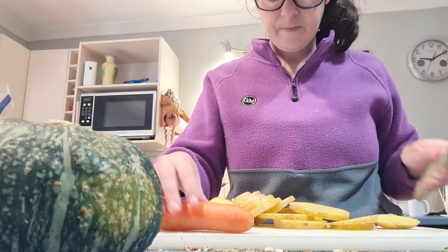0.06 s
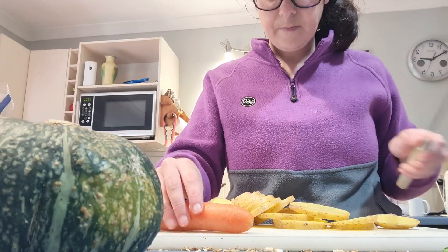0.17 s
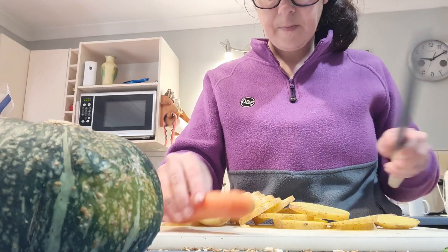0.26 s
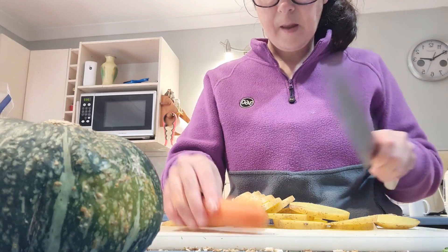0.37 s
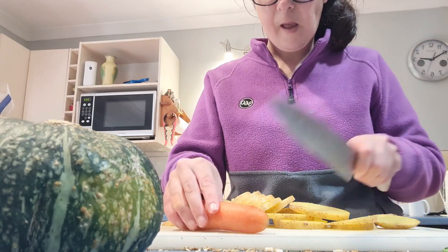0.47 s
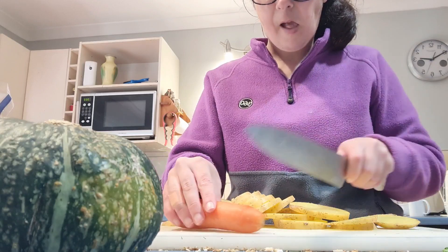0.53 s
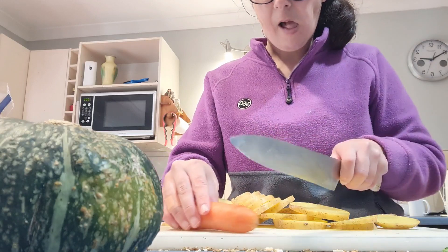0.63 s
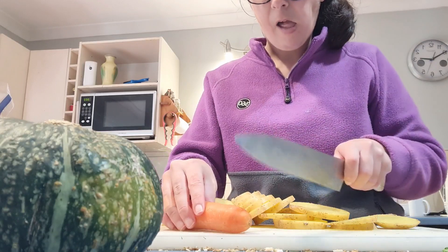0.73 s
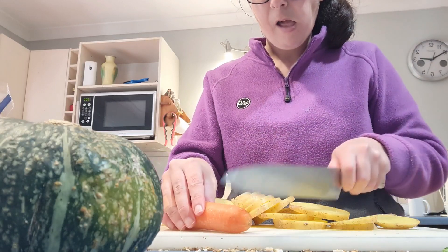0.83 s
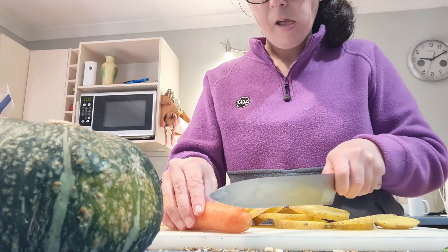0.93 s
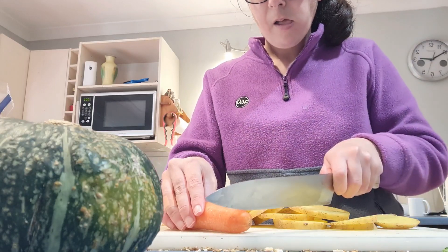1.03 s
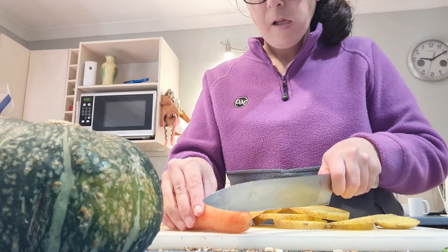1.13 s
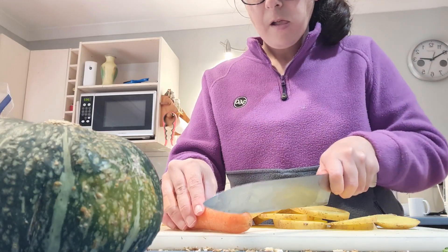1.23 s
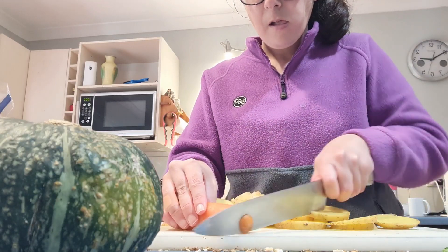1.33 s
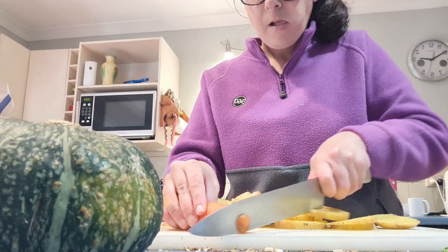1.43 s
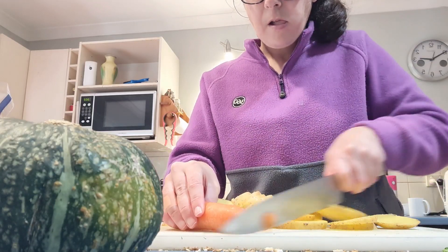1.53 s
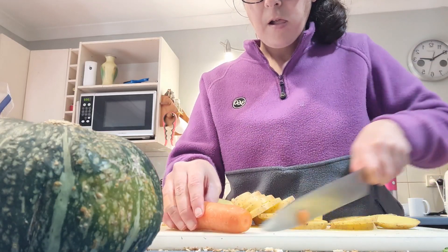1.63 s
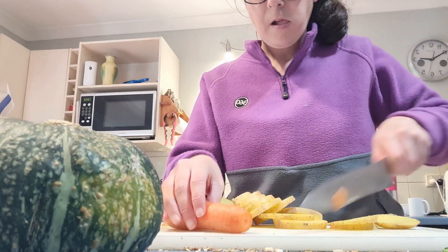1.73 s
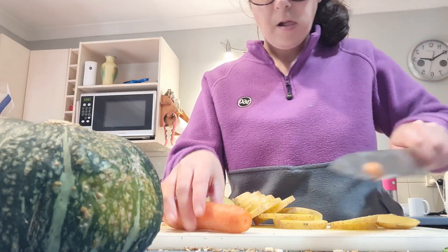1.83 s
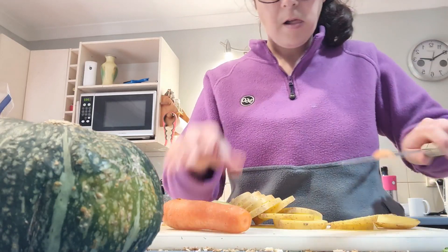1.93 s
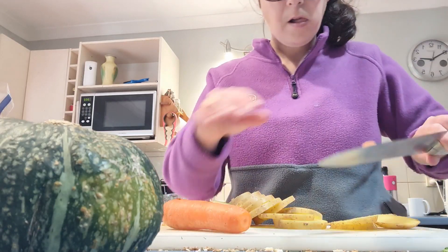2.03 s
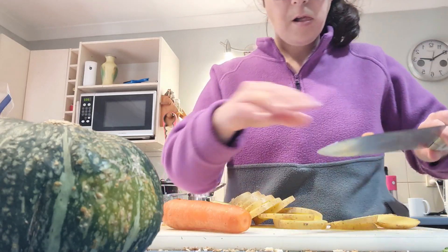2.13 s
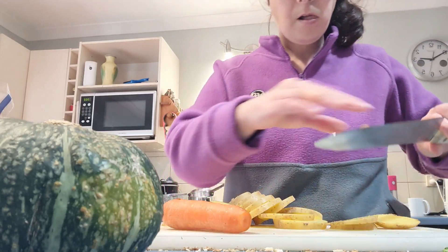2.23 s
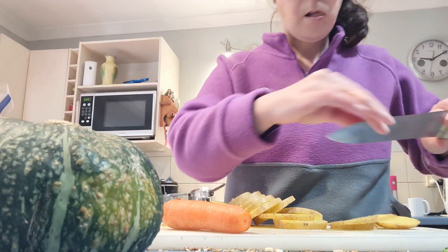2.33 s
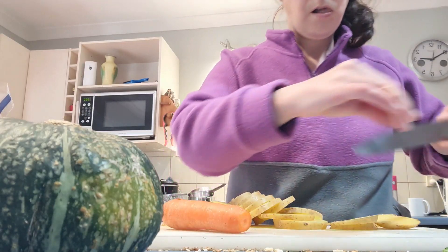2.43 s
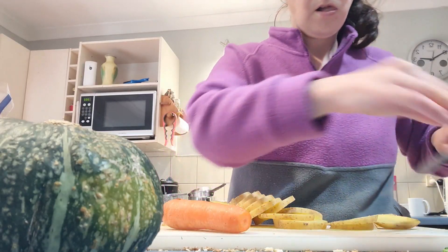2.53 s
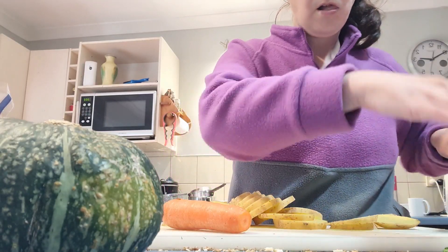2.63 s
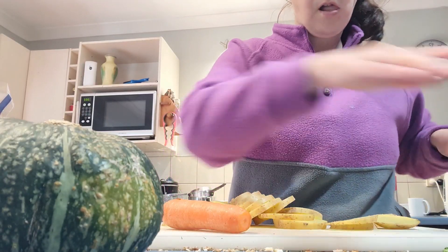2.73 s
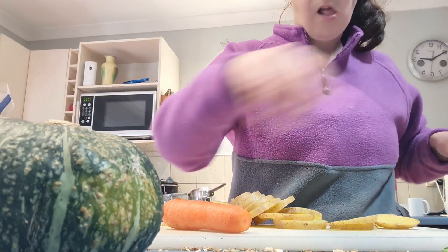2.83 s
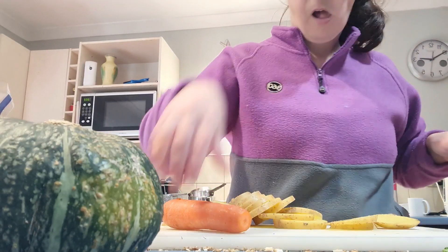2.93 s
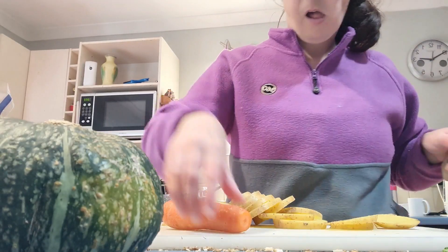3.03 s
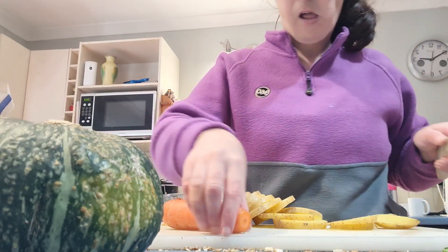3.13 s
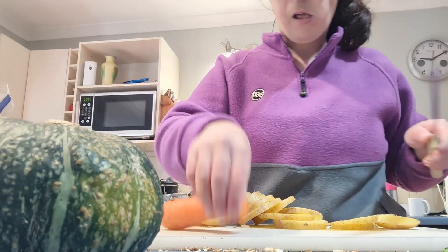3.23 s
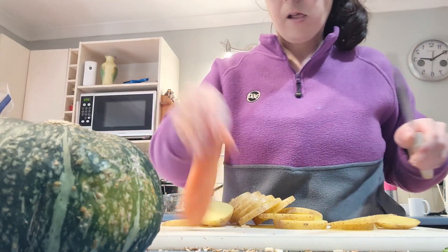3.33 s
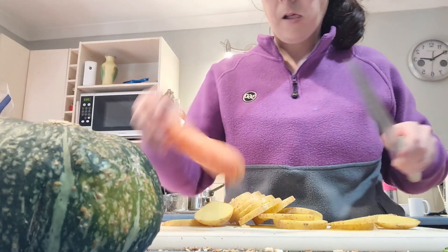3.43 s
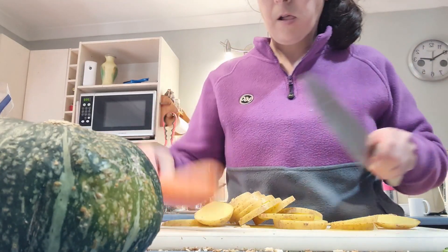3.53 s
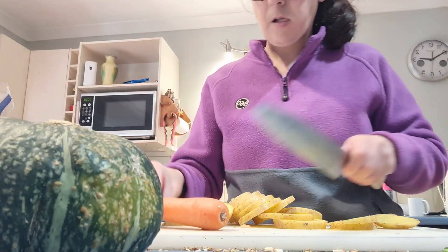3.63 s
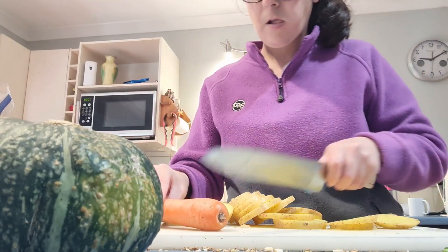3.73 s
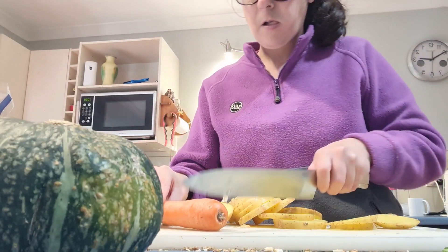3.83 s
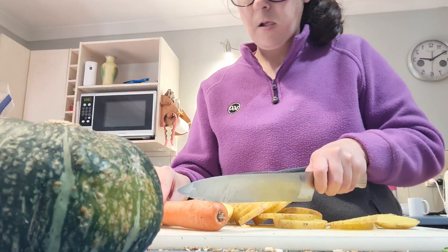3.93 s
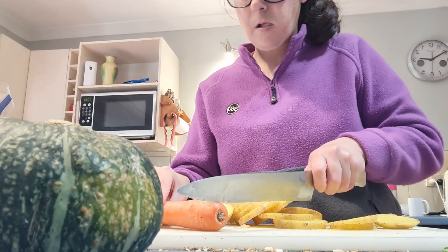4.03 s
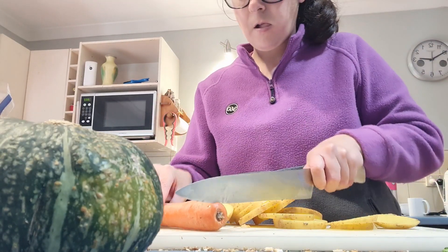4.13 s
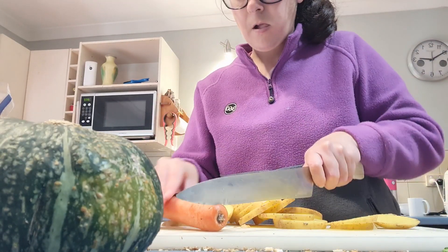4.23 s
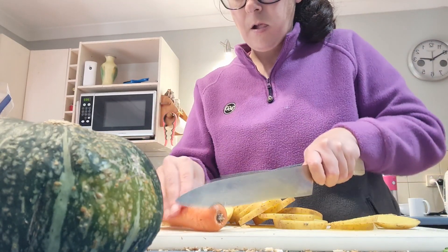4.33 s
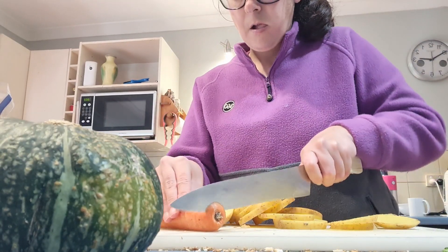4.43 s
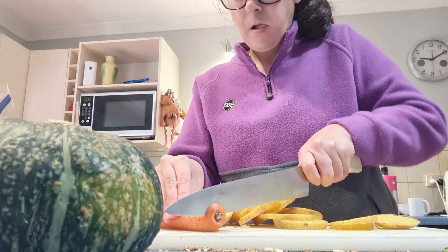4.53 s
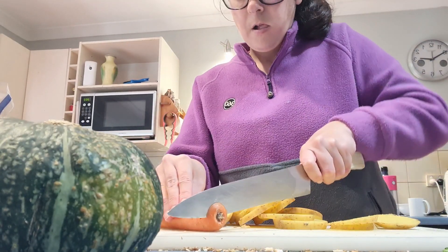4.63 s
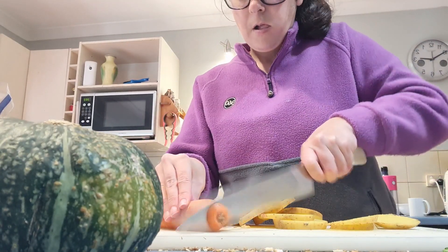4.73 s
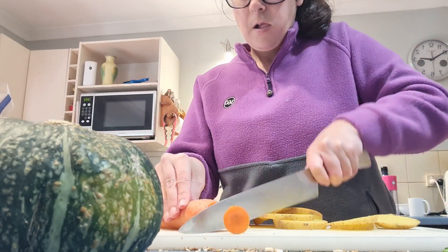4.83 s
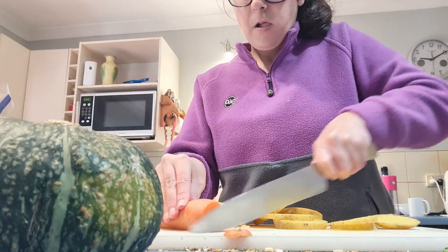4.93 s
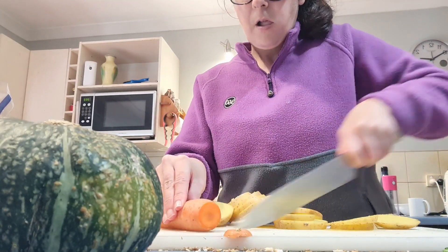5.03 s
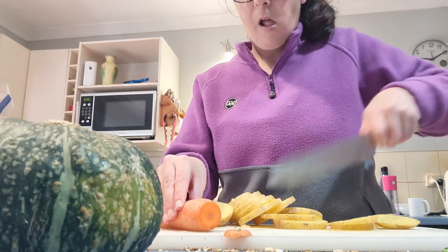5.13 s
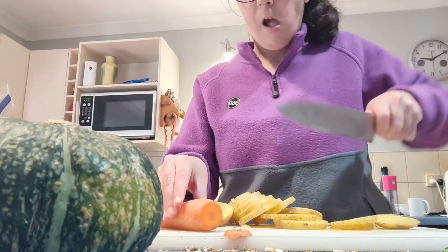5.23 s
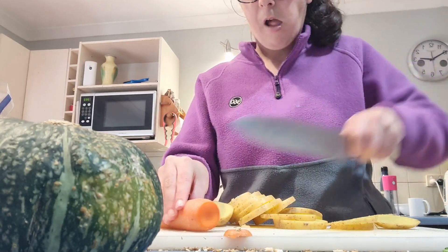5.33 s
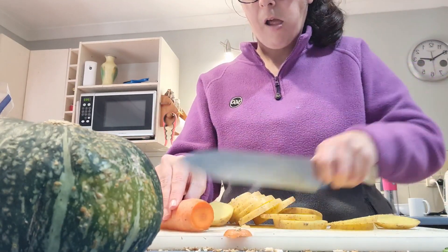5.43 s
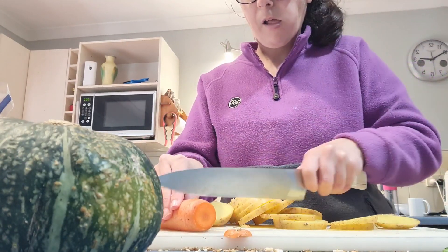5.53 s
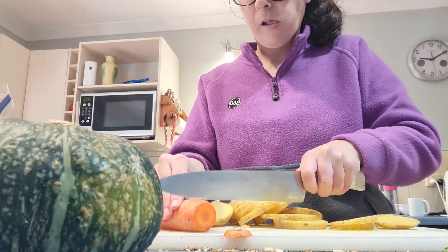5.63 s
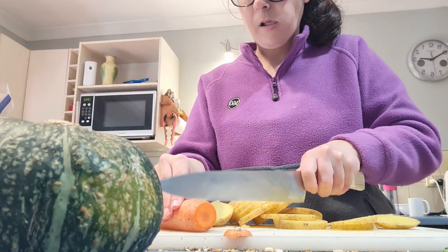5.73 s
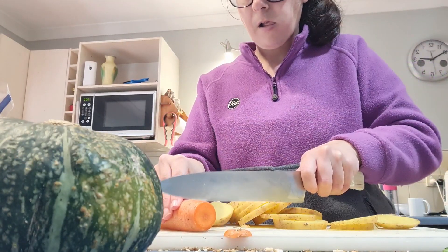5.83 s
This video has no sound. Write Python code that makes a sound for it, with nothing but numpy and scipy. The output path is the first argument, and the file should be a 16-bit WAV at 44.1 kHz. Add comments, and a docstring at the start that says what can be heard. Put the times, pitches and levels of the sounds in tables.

```python
"""A small kitchen: a carrot is laid on a wooden cutting board, trimmed, turned round and trimmed again.
Twice the knife crunches and knocks: decaying board modes under a short noise crack, plus steel rings.
Hand and carrot thud and shuffle, made of softer board blows, short notes and swells of noise.
Sleeves swish over a soft, swaying hiss of noise bands; echoes are decaying noise convolved with the
contacts, and a gain control holds down peaks above its threshold."""
import sys
import numpy as np
from scipy import signal
from scipy.io import wavfile

SR = 44100
rng = np.random.default_rng(int(sys.argv[2]) if len(sys.argv) > 2 else 0)


def generate_wav(signal):
    """Clip the signal to [-1, 1] and save it as 16-bit WAV at the path in sys.argv[1]."""
    frames = np.transpose(np.atleast_2d(signal))
    scaled = np.clip(frames, -1, 1) * 32767
    pcm = np.round(scaled).astype(np.int16)
    wavfile.write(sys.argv[1], SR, pcm)


N = 259308


def from_db(db):
    """Decibels to gain."""
    return 10 ** (np.asarray(db) / 20)


def rms_one(x):
    """Scale to rms 1."""
    return x / np.sqrt(np.mean(x ** 2) + 1e-20)


def blow_one(x):
    """Scale a blow to rms 1 over its first 30 ms."""
    return x / np.sqrt(np.mean(x[..., :int(0.03 * SR)] ** 2) + 1e-20)


def at_hz(points, hz, axis=1):
    """Read one column of a table on a log-frequency axis."""
    points = np.array(points)
    return np.interp(np.log(hz), np.log(points[:, 0]), points[:, axis])


def band(x, low, high, order=2):
    """Butterworth band-pass."""
    sos = signal.butter(order, [low, min(high, 0.45 * SR)], "band", fs=SR, output="sos")
    return signal.sosfilt(sos, x)


def add(out, s, sound):
    """Mix a sound in at time s."""
    i = int(round(s * SR))
    out[..., i:i + sound.shape[-1]] += sound[..., :N - i]


def dying(t, t60):
    """Exponential decay, 60 dB down after t60."""
    return np.exp(-np.log(1000) * t / t60)


SECOND_NOTE_T60_S = 0.079   # shared by the knife's and the carrot's second notes

# the knife comes down on the board: t/s, level/dB, pitch f/Hz, treble loss/dB per octave,
# second contact level/dB against the first, note level/dB against the blow, note t60/s,
# second note f/Hz, second note level/dB against the blow, factor on the board's ring times,
# steel level/dB against the blow
CUTS = [(1.3418, -21, 571.6, 4.5, -13.5, 9, 0.075, 205, -5.5, 0.66, -14.5),
        (4.7522, -16.5, 690.5, 5, -2, -6.5, .17, 368, -5, 0.65, -12)]
# ring of the steel: f/Hz, relative level/dB (before chance scatter), t60/s
MODES_OF_BLADE = [(2400, -1, 0.015), (2464, -1.5, 0.031), (3056, -0.5, 0.061), (3400, -5.5, 0.1),
                  (3920, -8, 0.08), (5900, -7, 0.012), (6850, 2, .045)]


def cuts():
    """The knife knocks on the board and its steel rings; returns that blow and the contact's notes."""
    board, near = np.zeros((2, 2, N))
    for (s, level_db, hz, treble_loss_db, second_db, note_db, note_t60,
         other_hz, other_db, ring, steel_db) in CUTS:
        levels_db = level_db + contact_levels(hz, 7.5, treble_loss_db)
        knock = blow(levels_db, ring, second_db, scatter_db=1)
        steel = blow_one(modes(MODES_OF_BLADE, ring=1, scatter_db=1).sum(axis=1))
        add(board, s, knock + from_db(level_db + steel_db) * steel)
        add(near, s, note(hz, level_db + note_db, note_t60))
        add(near, s, note(other_hz, level_db + other_db, SECOND_NOTE_T60_S))
    return board, near


# crunch close to a blow, as the carrot splits ahead of the edge or scuffs the board:
# end t/s, length/s, level at the end/dB, brightness f/Hz
SPLITS = [(1.3388, 0.0097, -20, 1196), (3.571, 0.011, -26.5, 700), (4.755, 0.022, -14.5, 5000)]


def splits(growth_db):
    """Bursting cells crackle as grainy noise that swells by growth_db up to the end of the crunch."""
    out = np.zeros((2, N))
    for end, length, level_db, bright_hz in SPLITS:
        grains = port_noise(bright_hz, SR // 4) * rng.exponential(1, SR // 4)
        coloured = band(band(grains, 300, CUTOFF_HZ), 250, bright_hz, order=1)
        crunch = rms_one(coloured)[:, :int(length * SR)]
        swell_db = growth_db * np.linspace(-1, 0, crunch.shape[1])
        add(out, end - length, crunch * from_db(level_db + swell_db))
    return out


# the steel edge pings as it meets the wood:
# t/s, f/Hz, level/dB, t60/s, overtone f/Hz, overtone level/dB against the ping
EDGE_PINGS = [(1.3419, 1320, -16, 0.019, 3670, -12), (4.7505, 1333, -16, 0.062, 2380, -9),
              (4.926, 1326, -45, 0.028, 2240, -14)]


def edge_pings():
    """The thin edge gives a very short note with one overtone, heard directly, without echo."""
    out = np.zeros((2, N))
    for s, hz, level_db, t60, overtone_hz, overtone_db in EDGE_PINGS:
        add(out, s, note(hz, level_db, t60))
        add(out, s, note(overtone_hz, level_db + overtone_db, 0.021))
    return out


# the carrot is set down: t/s, level/dB, pitch f/Hz, treble loss/dB per octave,
# second contact level/dB against the first, note level/dB against the blow, note t60/s,
# upper note f/Hz and level/dB, lower note f/Hz and level/dB, both against the blow
SET_DOWNS = [(0.3986, -26, 259, 8, -9, -2.5, 0.16, 650, -7.5, 220, -13),
             (3.5714, -22.5, 548, 4.5, 3.5, 3.5, 0.068, 809.5, 1.5, 404.4, -2.5)]


def set_downs(ring):
    """The carrot thuds on the board; returns the board's answer and the carrot's own three notes."""
    board, near = np.zeros((2, 2, N))
    for (s, level_db, hz, treble_loss_db, second_db, note_db, note_t60,
         upper_hz, upper_db, lower_hz, lower_db) in SET_DOWNS:
        # less bass loss than the knife: the carrot lands heavier
        levels_db = level_db + contact_levels(hz, 2, treble_loss_db)
        add(board, s, blow(levels_db, ring, second_db, scatter_db=1))
        notes = note(hz, note_db, note_t60)
        notes = notes + note(upper_hz, upper_db, SECOND_NOTE_T60_S)
        notes = notes + note(lower_hz, lower_db, 0.035)
        add(near, s, from_db(level_db) * notes)
    return board, near


# light touches of fingers, carrot and blade on the board:
# t/s, level/dB (before the common force), pitch f/Hz, treble loss/dB per octave
TOUCHES = [(0.599, -44.5, 175, 13), (0.747, -54, 221, 9), (1.079, -56.5, 177, 4), (1.21, -56.5, 546, 11.5),
           (1.571, -48, 130, 6), (1.631, -44.5, 218, 8), (1.693, -42, 595, 24), (2.686, -43, 450, 2.5),
           (2.815, -48, 477, 2.5), (2.887, -54.5, 500, 5), (3.106, -56, 270, 10.5), (3.909, -52.5, 190, 17),
           (4.099, -52.5, 220, 12), (4.335, -48, 297, 7), (4.416, -46, 265, 24.5), (4.469, -47, 288, 5.5),
           (4.587, -55.5, 248, 5.5), (4.924, -49.5, 1300, 7), (5.316, -50.5, 130, 11.5),
           (5.608, -57, 161.6, 12.5), (5.759, -47, 140, 11)]
TOUCH_RISE_CYCLES = 1.8   # time constant of the rise, in cycles of the pitch


def touches(force_db, ring):
    """Light contacts, damped by the hand: the lower their pitch, the slower they rise."""
    out, t = np.zeros((2, N)), np.arange(SR // 6) / SR
    for s, level_db, hz, treble_loss_db in TOUCHES:
        levels_db = contact_levels(hz, 4, treble_loss_db)[:5]   # without the top band
        board = blow(levels_db, ring, second_db=-6, scatter_db=3)
        rise = 1 - np.exp(-t * hz / TOUCH_RISE_CYCLES)
        add(out, s, from_db(level_db) * blow_one(board * rise))
    return from_db(force_db) * out


# edges of the bands in which a blow is built: f/Hz
BANDS = [50, 200, 480, 1000, 2000, 8000, 16000]
# how well the board radiates in each band: relative level/dB
BOARD_COLOUR_DB = [0.5, 2.5, 1.5, -1.5, 5.5, -3]


def contact_levels(pitch_hz, bass_loss_db, treble_loss_db):
    """A contact is strongest near its pitch and loses so many dB per octave either side; dB per band."""
    centres = np.sqrt(np.multiply(BANDS[:-1], BANDS[1:]))
    octaves = np.log2(centres / pitch_hz)
    return BOARD_COLOUR_DB + np.minimum(bass_loss_db * octaves, -treble_loss_db * octaves)


# resonances of the wood: f/Hz, level/dB relative within its band, t60/s before the ring factor
MODES_OF_BOARD = [(61.6, -17.5, 0.17), (139.7, 8.5, 0.18), (167.4, 4, 0.27), (198, -13.5, 0.062),
                  (260.2, -0.5, 0.16), (370, -2.5, 0.053), (399, 4, 0.05), (441, -16.5, 0.18),
                  (605, 4.5, 0.078), (706, -5.5, 0.18), (811, -9, 0.12), (943, -4.5, 0.026),
                  (1120, -11, .03), (1210, -2, 0.059), (1350, -2, 0.013), (1510, -11, 0.055),
                  (1917, -21, 0.0055), (2080, -1, .025), (2370, -6, 0.0037), (3340, -0.5, .015),
                  (4210, -8, 0.055), (4620, -3.5, 0.028), (5550, 0, 0.022), (6560, 0.5, 0.0091)]
# dense fast-dying part of a blow, one row per band: level/dB against the ringing, t60/s
CRACK = [(-11.5, 0.12), (-4, 0.11), (-3.5, 0.083), (-7, 0.058), (-5.5, 0.054), (0, 0.0088)]
SECOND_CONTACT_S = 0.0021   # heel and tip land one after the other


def blow(levels_db, ring, second_db, scatter_db):
    """One blow rings the board's modes over a short double crack, with its own level in each band."""
    rings = modes(MODES_OF_BOARD, ring, scatter_db)
    hz = np.array(MODES_OF_BOARD)[:, 0]
    out, t = 0, np.arange(rings.shape[-1]) / SR
    for level_db, low, high, (crack_db, crack_t60) in zip(levels_db, BANDS, BANDS[1:], CRACK):
        in_band = rings[:, (hz >= low) & (hz < high)].sum(axis=1)
        ringing = blow_one(band(in_band, low / 1.5, high * 1.5))
        second = (t > SECOND_CONTACT_S) * dying(t - SECOND_CONTACT_S, crack_t60)
        shape = dying(t, crack_t60) + from_db(second_db) * second
        crack = blow_one(band(port_noise(low, len(t)) * shape, low, high, order=3))
        out = out + from_db(level_db) * blow_one(ringing + from_db(crack_db) * crack)
    return out


# between the two microphone ports: f/Hz, radians by which the left leads
PORT_PHASE = [(60, .05), (250, .35), (600, 1.1), (1300, 1.25), (2500, 1.5), (7000, 1.2)]


def modes(table, ring, scatter_db):
    """Decaying sines of alternating sign, shape (ports, modes, samples); the left port leads."""
    t = np.arange(SR // 6) / SR
    hz, mode_db, t60 = np.transpose(table)
    signs = (-1) ** np.arange(len(hz))
    strength = from_db(mode_db + scatter_db * rng.standard_normal(len(hz))) * signs
    lead = at_hz(PORT_PHASE, hz)[:, None] * np.array([0.5, -0.5])[:, None, None]
    waves = np.sin(2 * np.pi * hz[:, None] * t + lead)
    return strength[:, None] * waves * dying(t, ring * t60[:, None])


def note(hz, level_db, t60):
    """The short note of something pressed against the board: one decaying sine."""
    ringing = modes([(hz, 0, t60)], ring=1, scatter_db=0).sum(axis=1)
    return from_db(level_db) * blow_one(band(ringing, hz / 2, hz * 2))


def port_noise(hz, size):
    """Diffuse noise at the two ports: long waves reach both alike."""
    alike = 1 / (1 + (hz / 400) ** 2)
    shared, own = rng.standard_normal(size), rng.standard_normal((2, size))
    return np.sqrt(alike) * shared + np.sqrt(1 - alike) * own


def rub(s, length, level_db, hz, width):
    """Light rubbing: a smooth swell of friction noise, loudest one half-length after it starts."""
    out = np.zeros((2, N))
    noise = rms_one(band(port_noise(hz, SR), hz / (1 + width), hz * (1 + width)))
    noise = noise[:, :int(2 * length * SR)]
    add(out, max(s - length, 0), from_db(level_db) * noise * np.hanning(noise.shape[1]))
    return out


# the carrot shuffles on the board: peak t/s, half-length/s, peak level/dB, f/Hz
SHUFFLES = [(1.303, 0.08, -44, 425), (1.641, 0.046, -48, 233), (1.949, .04, -57, 170),
            (3.276, .07, -58, 177), (4.356, .033, -50.5, 276), (4.449, .07, -50, 240),
            (5.34, 0.049, -57, 195)]
# sleeve and skin swish: peak t/s, half-length/s, peak level/dB
SWISHES = [(0.127, 0.11, -50), (.864, 0.048, -49), (1.026, 0.014, -48), (1.967, 0.052, -46.5),
           (2.148, 0.019, -47.5), (2.667, 0.016, -46), (3.093, 0.083, -58.5), (3.815, 0.024, -43.5),
           (3.9, 0.11, -51), (4.482, .04, -45.5), (5.72, 0.089, -47.5)]


def handling():
    """Low shuffles of the carrot and high swishes of sleeve and skin."""
    shuffles = sum(rub(*row, width=0.45) for row in SHUFFLES)
    swishes = sum(rub(*row, hz=4470, width=0.25) for row in SWISHES)
    return shuffles + swishes


# kitchen echo: f/Hz, tail t60/s, relative echo level/dB
ROOM = [(70, 0.34, -14.5), (140, 0.51, -10.5), (305, 0.35, -12), (700, 0.48, -9.5), (1400, 0.3, -9),
        (3500, 0.45, -4.5), (7200, 0.12, -12.5), (14000, .16, -7)]


def kitchen(x, first_s, early_db, early_t60):
    """Strong early reflections off worktop and cupboards over a diffuse tail that dies band by band."""
    t, edges, response = np.arange(SR // 2) / SR, np.geomspace(45, 16500, 13), 0
    for low, high in zip(edges, edges[1:]):
        hz = np.sqrt(low * high)
        decay = dying(t, at_hz(ROOM, hz)) + from_db(early_db) * dying(t, early_t60)
        echo = rms_one(band(port_noise(hz, len(t)) * decay * (t > first_s), low, high))
        share = np.sqrt(2 * (high - low) / SR / len(t))   # the band's part of a unit-energy response
        response = response + from_db(at_hz(ROOM, hz, axis=2)) * echo * share
    return signal.fftconvolve(x, response, axes=1)[:, :N]


def drift(rate):
    """Slow chance with spread 1: noise through two poles at rate Hz, made at every 40th sample."""
    r = np.exp(-80 * np.pi * rate / SR)
    slow = signal.lfilter([1], [1, -2 * r, r * r], rng.standard_normal(N // 40 + 2002))[2000:]
    return np.interp(np.arange(N) / 40, np.arange(len(slow)), rms_one(slow))


# colour of the hiss: f/Hz, relative spectral level/dB
HISS = [(30, -19), (55, 0.5), (130, -1.5), (350, -8.5), (800, -9), (1700, -11), (2500, -15.5), (3500, -10),
        (4900, 2.5), (6000, -7.5), (7300, -12), (9300, -20.5), (16000, -15.5)]
# slow sway of the hiss: t/s, level/dB, of which only the departure from the mean is used
HISS_LEVEL = [(0.0, -54.5), (0.56, -53), (1.46, -54.5), (1.64, -54), (1.77, -54.5), (2.75, -55.5),
              (3.06, -53), (3.49, -55), (5.81, -52.5), (5.88, -57.5)]
# what both ports hear alike: f/Hz, share of the hiss power
LIKENESS = [(60, 1), (200, 1), (800, 0.27), (1300, 0.95), (2200, 0.6), (4500, 0.63), (14000, 0.048)]
HISS_LAG_S = 0.00026   # the right port hears the shared hiss later


def hiss(level_db, flicker_db, ripple_db):
    """Hiss from the left in narrow bands, flickering a little and coloured by nearby surfaces."""
    out, edges = 0, np.geomspace(30, 16500, 22)
    shared, own = rng.standard_normal((2, N)), rng.standard_normal((2, 2, N))
    together = drift(6.6)
    for k, (low, high) in enumerate(zip(edges, edges[1:])):
        hz = np.sqrt(low * high)
        alike = at_hz(LIKENESS, hz)
        source = shared[k % 2]   # neighbouring bands use different noise
        direct = np.array([source, np.roll(source, round(HISS_LAG_S * SR))])
        gain = from_db(at_hz(HISS, hz) + flicker_db * (together + drift(19)))
        noise = np.sqrt(alike) * direct + np.sqrt(1 - alike) * own[k % 2]
        out = out + gain * band(noise, low, high)
    t = np.arange(SR // 25) / SR
    echoes = band(rng.standard_normal((2, len(t))) * dying(t, 0.085), 670, 16000, order=1)
    echoes = rms_one(echoes) / np.sqrt(len(t))
    out = out + from_db(ripple_db) * signal.fftconvolve(out, echoes, axes=1)[:, :N]
    sway_db = np.interp(np.arange(N) / SR, *np.transpose(HISS_LEVEL))
    return rms_one(out) * from_db(level_db + sway_db - sway_db.mean())


# narrow resonances in the hiss: f/Hz, width/Hz, rms level/dB before the common level
HISS_PEAKS = [(3560, 36, -75), (4320, 51, -65), (4720, 60, -63), (4854, 20, -57), (5100, 190, -66),
              (5360, 49, -59), (6980, 42, -68)]


def hiss_peaks(level_db):
    """The hiss sings faintly in a few narrow resonances."""
    out = 0
    for hz, width, peak_db in HISS_PEAKS:
        noise = band(rng.standard_normal((2, N)), hz - width / 2, hz + width / 2, order=1)
        out = out + from_db(level_db + peak_db) * rms_one(noise)
    return out


def scene():
    """Work on the board close to the microphone, its echo in the kitchen, and the background."""
    knocks, knife_notes = cuts()
    thuds, carrot_notes = set_downs(ring=0.87)
    board = knocks + thuds + splits(growth_db=26.5) + touches(force_db=0.5, ring=0.8)
    near = knife_notes + carrot_notes
    stirring = board + from_db(-14) * near   # small bodies radiate little into the room
    room = kitchen(stirring, first_s=0.011, early_db=11.5, early_t60=0.12)
    background = hiss(level_db=-51.5, flicker_db=1.5, ripple_db=-0.5) + hiss_peaks(level_db=-2.0)
    return board + near + edge_pings() + handling() + room + background


def gain_control(x, threshold_db, release_db_per_s, attack_s):
    """Loud peaks pull the gain down; it creeps back."""
    over = np.maximum(20 * np.log10(np.abs(x).max(axis=0) + 1e-9) - threshold_db, 0)
    ramp = release_db_per_s * np.arange(N) / SR
    held = np.maximum.accumulate(over + ramp) - ramp   # peak hold, falling at the release rate
    r = np.exp(-1 / (attack_s * SR))
    return x * from_db(-signal.lfilter([1 - r], [1, -r], held))


CUTOFF_HZ = 15900   # top of the sound, also of the crunch


def record(dry):
    """Gain control, rounded peaks and a steep top cut."""
    held = gain_control(dry, threshold_db=-1.0, release_db_per_s=34, attack_s=0.00047)
    top_cut = signal.ellip(10, 0.1, 80, CUTOFF_HZ, fs=SR, output="sos")
    return signal.sosfilt(top_cut, np.tanh(held))


dry = scene()
out = record(dry)
generate_wav(out)
```